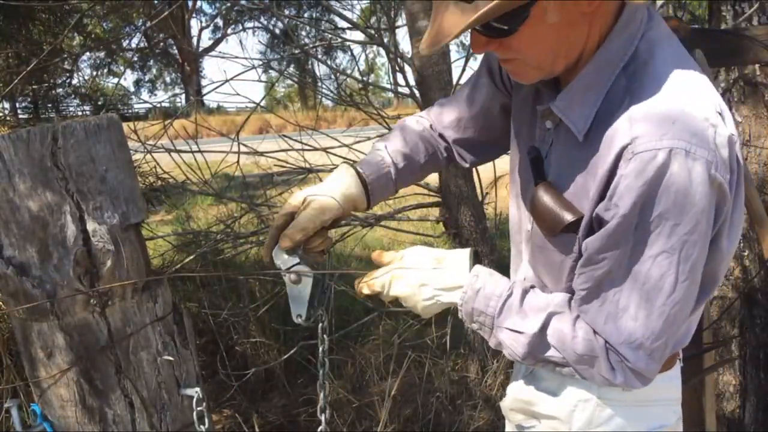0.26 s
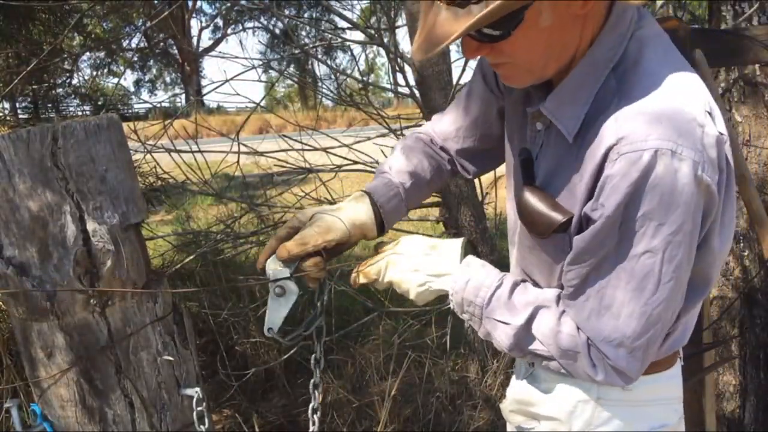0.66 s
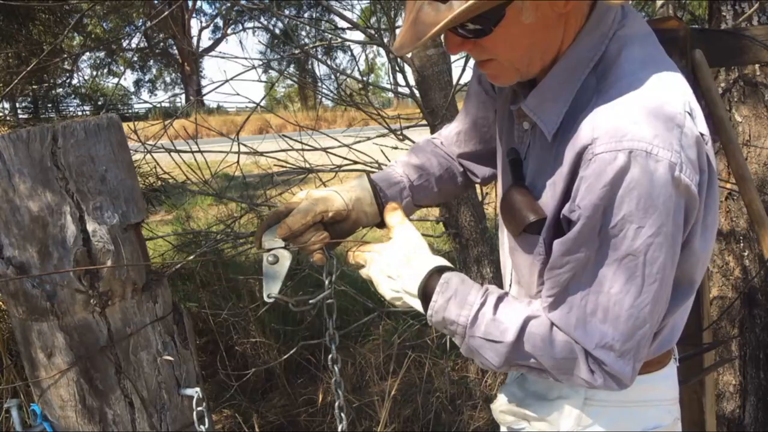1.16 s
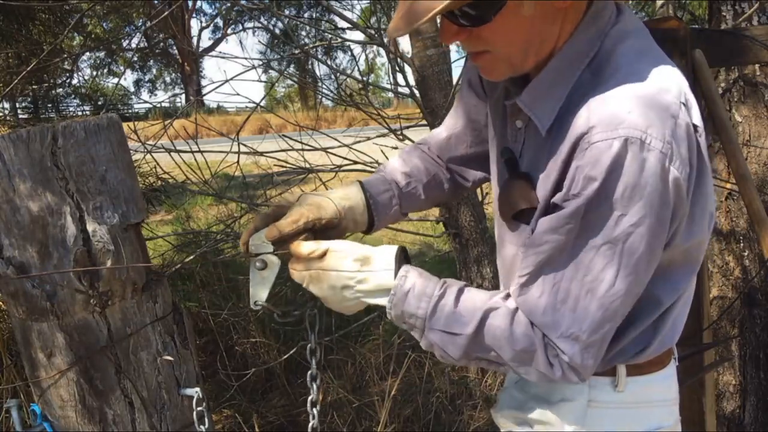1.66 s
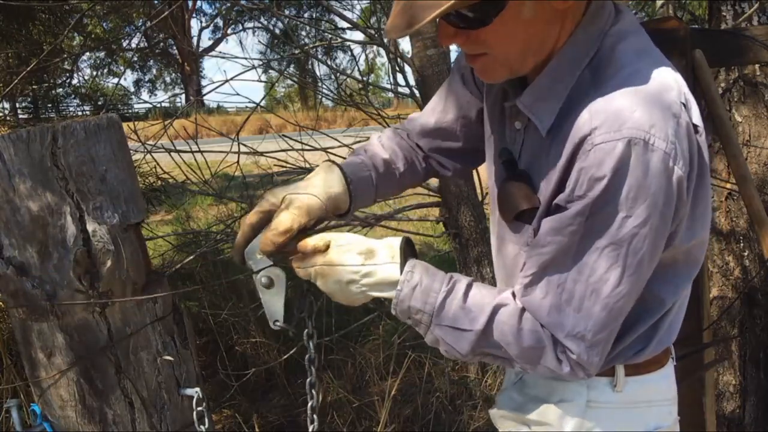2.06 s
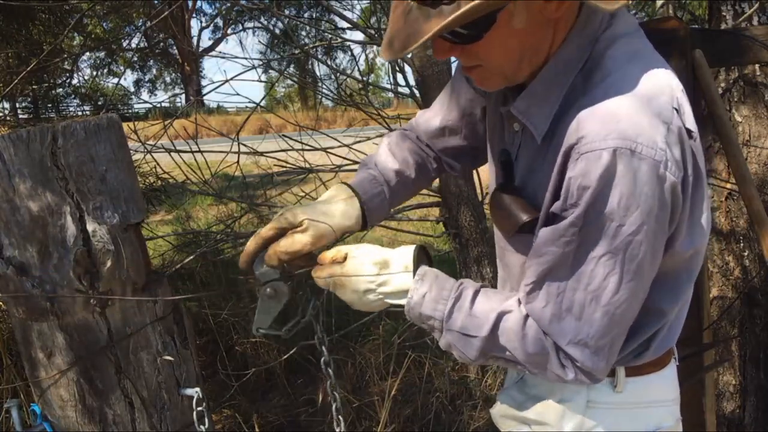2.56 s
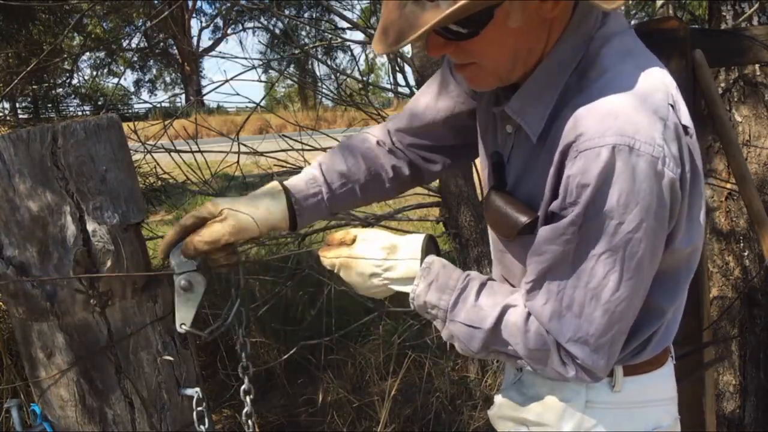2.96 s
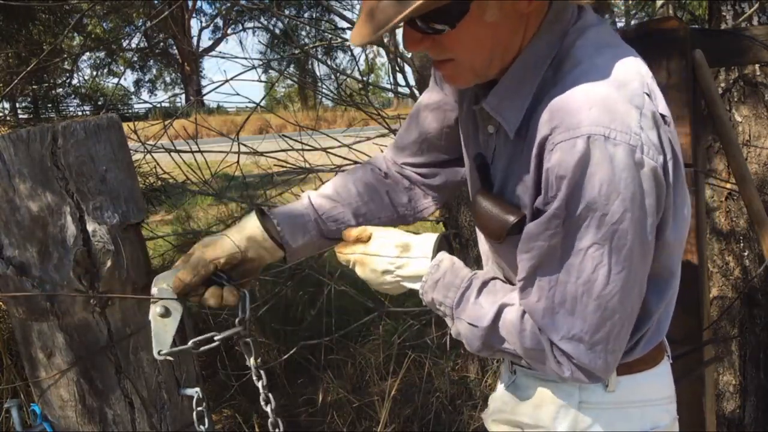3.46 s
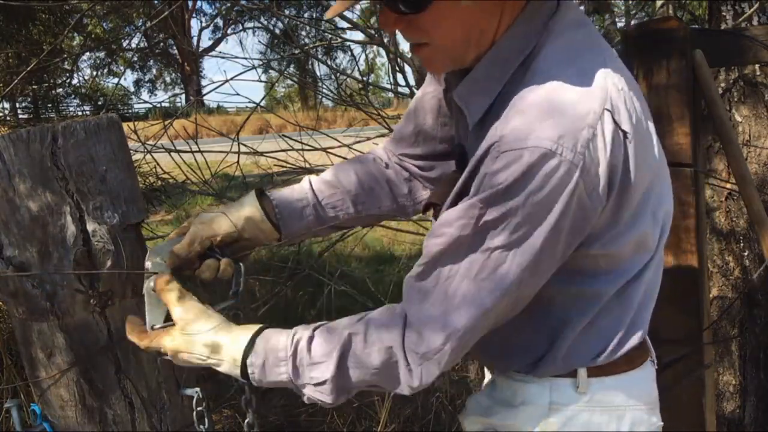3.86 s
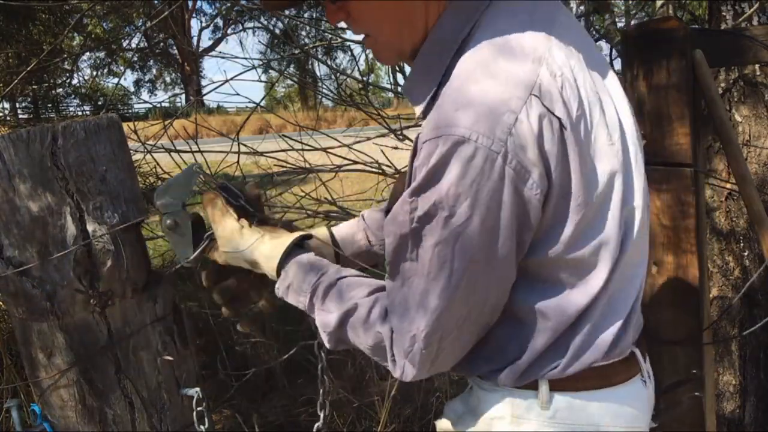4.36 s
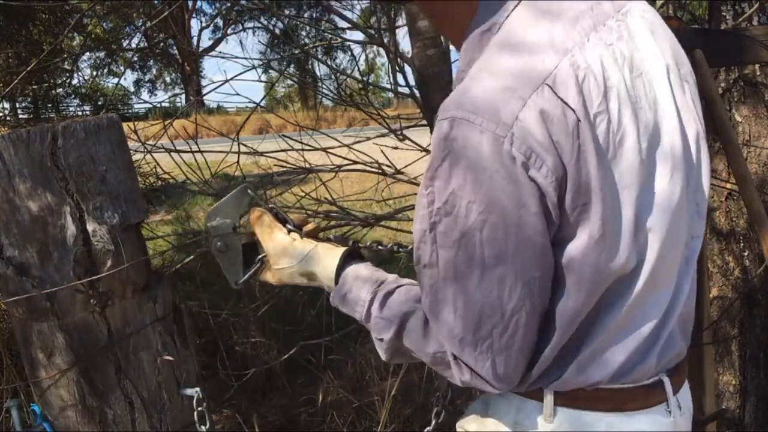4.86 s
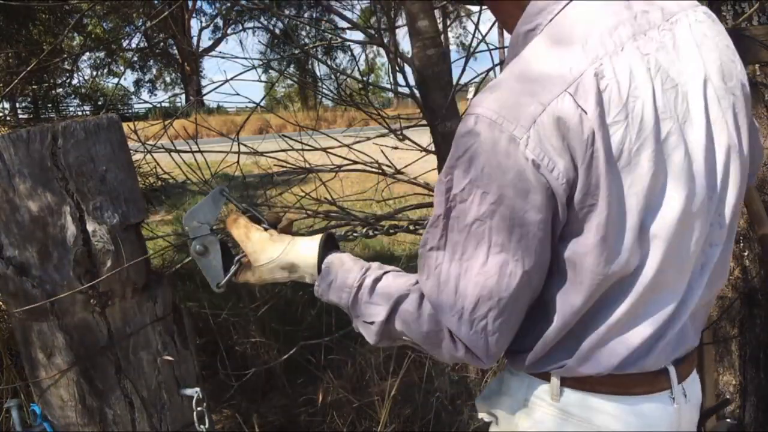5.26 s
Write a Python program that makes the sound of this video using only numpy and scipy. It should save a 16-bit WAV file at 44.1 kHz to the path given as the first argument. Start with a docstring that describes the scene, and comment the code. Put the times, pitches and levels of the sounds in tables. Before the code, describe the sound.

Close and dry, outdoors, over a quiet low hum of open air, soft wind rumble and faint distant road. From 0 to 0.4 s small chain links clink quickly and brightly, with light jaw knocks. At 0.6 s comes a firm clustered steel knock, then sparse ticks and clinks until 1.4 s. Small birds give short gliding whistles near 0.5, 1.1, 1.5 and most clearly 2.1-2.5 s, while gloves rub lightly. From 2.5 to 3.4 s the grip is pushed along the wire with gritty scrapes, tiny falling squeals at 2.6 and 3.1 s, and dense chain jingling, strongest near 2.75 s. Clicks and clinks resume from 3.8 s, with a faint bird. From 4.1 to 5.1 s the sleeve rustles in sweeps; knocks and thin high pings follow from 4.8 s. At 5.4-5.45 s a rapid, grating, loud steel clack closes the grip with a short high ring.

```python
"""Straining a fence wire

Outdoors, close to the microphone, gloved hands fit a steel chain strainer to a fence wire.
Chain, jaws and a loose part ring as decaying modes with noise at each contact; the grip clacks shut at the end.
Glove, sleeve and wire rub as dense random slips of filtered noise, and two pushes squeal.
Behind them small birds call in gliding whistles over the low hum of open country and moving air."""
import sys
import numpy as np
from scipy import signal
from scipy.fft import rfft, irfft
from scipy.io import wavfile
from scipy.ndimage import uniform_filter1d

SR = 44100
rng = np.random.default_rng(int(sys.argv[2]) if len(sys.argv) > 2 else 0)


def digitize_waveform(pressure):
    """Quantize a signal to 16-bit integers and store it at the path in sys.argv[1].

    Rows of a 2-D input are taken as channels; values are limited to [-1, 1].
    """
    field = np.atleast_2d(pressure).T
    bounded = np.clip(field, -1, 1)
    quanta = np.round(bounded * 32767).astype(np.int16)
    wavfile.write(sys.argv[1], SR, quanta)


N = 242356
TIME = np.arange(N) / SR
RING_TIME = np.arange(SR // 3) / SR  # every single hit lasts a third of a second

LINK_HZ = 4654  # pitch of an ordinary link
# clear clinks of the chain, levels before the trims in chain():
# [t/s, contact tick level/dB, low ring level/dB, high ring level/dB, link pitch f/Hz]
CLINK_EVENTS = [(0.0158, -38, -32.5, -36.5, 4700), (0.0394, -48, -39.5, -51, 4750),
                (0.1023, -54, -36.5, -43, 4760), (0.1113, -51, -30, -40.5, 4770),
                (0.137, -51, -38, -54, 4800), (0.1705, -42, -41.5, -43.5, 4750),
                (0.2029, -34, -36, -60, 4530), (0.26, -53, -38, -66, 4700), (0.3416, -56, -35.5, -61, 4360),
                (0.3979, -37, -39, -45, 4030), (0.6818, -49, -43, -69, 4700), (0.7954, -45, -38, -46, 4760),
                (0.8914, -39, -39.5, -46, 4750), (0.961, -38, -58, -40.5, 4700),
                (1.2208, -32, -38.5, -62, 5060), (1.3178, -38, -40, -66, 5100),
                (1.3482, -59, -50, -38, 4660), (1.4025, -38.5, -66, -58, 4660),
                (2.0098, -45, -63, -61, 4570), (2.0343, -43.5, -55, -52, 4500),
                (2.092, -48, -60, -46, 4660), (2.391, -36, -42, -59, 4660), (2.4588, -35, -48, -37.5, 4630),
                (2.572, -44, -33, -45, 4700), (2.7455, -29, -34, -33.5, 4730),
                (2.7572, -31, -28.5, -37, 4682), (3.1844, -56, -38, -38, 4697),
                (3.2163, -55, -30, -56, 4660), (3.2327, -48, -42, -62, 4600),
                (3.2882, -44, -34, -33.5, 4610), (3.3102, -43, -34, -41, 4603),
                (3.3414, -41, -39, -63, 4620), (3.367, -58, -38, -66, 4740), (3.475, -38.5, -52, -52, 4650),
                (3.814, -36, -57, -42, 4660), (3.8577, -33, -52, -43, 4660), (3.9992, -44, -42, -34, 4660),
                (4.018, -33, -41, -28.5, 4200), (4.1565, -34, -59, -42.5, 4580),
                (4.2332, -35.5, -46, -40.5, 4610), (4.2644, -32, -57, -43, 4330),
                (4.2902, -40, -43, -36, 4660), (4.341, -38, -58, -45, 4660), (4.54, -53, -41, -38.5, 4750),
                (4.8037, -26, -58, -41, 4666)]
# spells in which the chain jostles; slack links ring, held links only tick:
# [start t/s, end t/s, touches per s, mean tick level/dB, mean low ring level/dB]
JOSTLE_SPELLS = [(0, .2, 18.3, -69, -58), (.205, .39, 35, -51, -51.5), (0.652, 1.195, 8, -53, -65),
                 (2.56, 2.816, 70, -57, -45.5), (2.825, 3.385, 45, -55, -50.5),
                 (3.401, 3.619, 23, -46.5, -58), (4.102, 4.7, 13.1, -44, -54)]


def chain(tick_db=-4.0, low_db=-2.5, high_db=-2, spread_db=2.0, faint_high_db=-7):
    """Clear clinks of swinging links, with many faint touches between them."""
    out = np.zeros(N)
    for s, contact_db, low_ring_db, high_ring_db, pitch_hz in CLINK_EVENTS:
        hit = clink(contact_db + tick_db, low_ring_db + low_db, high_ring_db + high_db, pitch_hz)
        add(out, s, hit)
    for start, end, per_s, contact_db, ring_db in JOSTLE_SPELLS:
        for slot in np.arange(start, end, 1 / per_s):
            mean_levels = [contact_db, ring_db, ring_db + faint_high_db]
            levels = mean_levels + spread_db * rng.standard_normal(3)
            add(out, slot + rng.random() / per_s, clink(*levels, LINK_HZ))
    return out


# modes of a chain link, low group as on an ordinary link: [f/Hz, relative level/dB, t60/s]
LINK_LOW_MODES = [(3940, -12, 0.019), (4270, -28, 0.023), (4626, 0.5, 0.036), (4820, -1.5, 0.013)]
# modes of a chain link, high group: [f/Hz, relative level/dB, t60/s]
LINK_HIGH_MODES = [(8400, -15, 0.051), (10200, -1.5, 0.063), (10790, 8.5, 0.054), (12050, -11, 0.092),
                   (11420, 12.5, 0.028), (12100, -22, .08), (12200, -45, 0.067), (15700, -28, .04)]
# spectrum of the contact tick: [f/Hz, relative level/dB]
TICK_SPECTRUM = [(600, -61), (2000, 8.5), (3800, 8), (6000, 13), (7200, 2.5), (9000, 7.5), (12000, -1),
                 (15500, -5)]


def clink(contact_db, low_db, high_db, pitch_hz):
    """One link touches another: a tick and two groups of modes, the low group tuned to the link's pitch."""
    contact = colour(burst(t60=0.003, tail_t60=0.054, tail_db=-31), TICK_SPECTRUM)
    tick = peaked(chatter(contact, t60=0.018), contact_db)
    tuned_modes = np.array(LINK_LOW_MODES) * [pitch_hz / LINK_HZ, 1, 1]
    low = peaked(chatter(ring(tuned_modes, detune=0.0032, scatter=0.71), t60=0.018), low_db)
    high = peaked(chatter(ring(LINK_HIGH_MODES, detune=0.0085, scatter=1.0), t60=0.03), high_db)
    return tick + low + high


# jaws and lever knocking on wire and chain, ending in the clack of the grip; the body level is
# before the trims in jaws(): [t/s, body level/dB, crack level/dB]
KNOCK_EVENTS = [(0.203, -33.5, -38.5), (0.251, -38.5, -40.5), (0.342, -41, -37), (0.602, -35, -48),
                (0.6065, -31, -29.5), (0.617, -28.5, -29), (1.142, -37, -42.5), (1.205, -44, -58),
                (1.221, -39.5, -60), (1.262, -49, -67), (1.315, -38, -55), (1.635, -39.5, -66),
                (2.367, -40, -48.5), (2.449, -42, -46), (2.555, -32, -43), (2.6549, -36, -31.5),
                (3.042, -33.5, -40), (3.34, -35.5, -42.5), (3.871, -33, -35.5), (4.002, -42, -39),
                (4.791, -32, -38), (4.805, -35, -38), (4.930, -31.5, -27), (4.965, -48, -30),
                (4.982, -28, -38), (5.101, -32.5, -47), (5.302, -32, -27), (5.3855, -19.5, -52),
                (5.3884, -18, -39), (5.399, -17.5, -32), (5.4118, -20, -27), (5.420, -25.5, -29),
                (5.436, -14.5, -25), (5.4396, -16, -18), (5.446, -17.5, -23.5), (5.472, -42, -35)]
# modes of the strainer's jaws, ungloved: [f/Hz, relative level/dB, t60 before damping/s]
STRAINER_MODES = [(330, -14, 0.09), (440, -11, 0.12), (666, 1.5, 0.066), (975, 7.5, 0.023),
                  (1043, 1, 0.061), (1120, -14, 0.04), (1397, 4.5, 0.025), (1630, -5, 0.17),
                  (1750, 11, 0.016), (2025, 6, 0.057), (2423, 1, 0.039), (2600, -13, 0.04),
                  (3320, -19, 0.016), (4250, -13, 0.02), (6640, -7.5, 0.064)]
# spectrum of the dull body, for knocks and grinding: [f/Hz, relative level/dB]
THUD_SPECTRUM = [(60, -70), (160, -33), (290, 5), (450, 7.5), (700, -4), (1100, 5), (2000, -6.5),
                 (3000, -3.5), (4500, -12.5), (8000, -22.5), (15000, -20)]
# spectrum of the bright edge, for knocks and grinding: [f/Hz, relative level/dB]
CRACK_SPECTRUM = [(800, 1.5), (2500, 3), (4200, 4.5), (6500, 0), (7700, -6), (9200, 0.5), (12000, -5.5),
                  (15500, -13)]


def jaws(thud_db=-5, modes_db=-2.0, damping=1.33):
    """Heavy steel parts, damped by the glove: a crack, a thud and a short clang."""
    out = np.zeros(N)
    for s, body_db, crack_db in KNOCK_EVENTS:
        thud = colour(burst(t60=0.013, tail_t60=0.084, tail_db=-19), THUD_SPECTRUM)
        clang = ring(STRAINER_MODES, detune=.0015, scatter=.25, damping=damping)
        edge = colour(burst(t60=0.014, tail_t60=0.096, tail_db=-7), CRACK_SPECTRUM)
        crack = chatter(edge, t60=0.0097)
        body = peaked(thud, body_db + thud_db) + peaked(clang, body_db + modes_db)
        add(out, s, body + peaked(crack, crack_db))
    return out


BOUNCE_GAP_S, BOUNCE_LOSS_DB_PER_S = .011, 90
# a free-hanging steel part struck: [t/s, level of first bounce before buzz/dB, bouncing time/s]
PING_EVENTS = [(4.933, -35, .018), (5.094, -28, 0.005), (5.16, -45.5, .03), (5.298, -28, .04),
               (5.448, -10, 0.005)]
# modes of the free-hanging part: [f/Hz, relative level/dB, t60/s]
HANGING_MODES = [(8950, -28, 0.046), (9760, -22, 0.084), (9900, -3.5, 0.079), (10030, -20, 0.063),
                 (10370, -12, 0.094), (10760, -18, .07), (12200, -33, .11), (14100, -36, .065),
                 (14620, -38, .1)]


def pings(build_s=0.0005):
    """Loose steel bounces ever more weakly; its high ring builds up during contact, beats and buzzes."""
    out = np.zeros(N)
    for s, db, bouncing_s in PING_EVENTS:
        for lag in np.arange(0, bouncing_s, BOUNCE_GAP_S):
            tone = ring(HANGING_MODES, detune=.0007, scatter=.12)
            build_up = 1 - np.exp(-RING_TIME / build_s)
            add(out, s + lag, peaked(tone * build_up, db - BOUNCE_LOSS_DB_PER_S * lag))
    buzz = undb(1.5 * walk(400))
    return out * buzz


GRIND_ATTACK_S, GRIND_RELEASE_S = 0.015, .14
# the jaws grinding shut on the wire: [t/s, length/s, body level/dB, hiss level/dB]
GRIND_STROKES = [(5.39, 0.043, -41, -35.5)]


def grind():
    """Between its knocks the closing grip grates on the wire in dense slips."""
    slips = friction(grains_per_s=1800, spread_db=0.5, smooth_db=-7, jerk_db=2.5)
    body, hiss = colour(slips, THUD_SPECTRUM), colour(slips, CRACK_SPECTRUM)
    return strokes(GRIND_STROKES, body, hiss, GRIND_ATTACK_S, GRIND_RELEASE_S)


PUSH_ATTACK_S, PUSH_RELEASE_S = 0.011, 0.17
SQUEAL_SAG_HZ_PER_S = 7300
# pushes of the grip along the wire, levels before the trim in scrape():
# [t/s, length/s, body level/dB, hiss level/dB]
PUSH_STROKES = [(2.52, 0.05, -34, -46), (2.625, 0.096, -36, -52), (2.72, .15, -43, -61),
                (2.875, 0.19, -38.5, -56), (3.085, 0.027, -34.5, -50)]
# two of the pushes make the wire squeal: [t/s, length/s, starting pitch f/Hz, level/dB]
SQUEAL_EVENTS = [(2.631, 0.087, 2290, -37.5), (3.085, 0.069, 1706, -38.5)]
# resonances of the wire as the grip scrapes along it: [f/Hz, width/Hz, mean relative level/dB]
WIRE_RESONANCES = [(384, 230, 4.5), (945, 270, 1), (1340, 190, 5), (1720, 120, 0), (1980, 96, 1.5),
                   (3300, 490, -2.5), (4440, 82, -10)]
# spectrum of the rub, for scrape and gloves: [f/Hz, relative level/dB]
RUB_SPECTRUM = [(50, 0.5), (150, -4), (350, 1.5), (700, -2), (1200, -1), (1900, -2), (2700, -5.5),
                (4500, -1), (6000, -19.5), (15000, -32)]
# spectrum of the fine hiss, for scrape and gloves: [f/Hz, relative level/dB]
HISS_SPECTRUM = [(1500, -16), (3500, 7), (4700, 18.5), (5500, 6), (7600, 0.5), (9000, 2), (11000, -5),
                 (13000, -6.5), (15500, -6)]


def scrape(rub_db=-2, shift_db=4.0, trim_db=-1, squeal_width_hz=170):
    """The grip is pushed along the wire; resonances come and go, two pushes squeal with a falling pitch."""
    slips = friction(grains_per_s=2100, spread_db=2.5, smooth_db=-3, jerk_db=0.3)
    wire = np.zeros(N)
    for hz, width, db in WIRE_RESONANCES:
        resonance = signal.lfilter(*signal.iirpeak(hz, hz / width, fs=SR), slips)
        wire += undb(db + shift_db * walk(16)) * resonance
    body = unit(wire) + undb(rub_db) * unit(colour(slips, RUB_SPECTRUM))
    hiss = colour(slips, HISS_SPECTRUM)
    out = undb(trim_db) * strokes(PUSH_STROKES, body, hiss, PUSH_ATTACK_S, PUSH_RELEASE_S)
    flutter = unit(signal.lfilter(*signal.butter(2, squeal_width_hz, fs=SR), slips))
    for s, length, start_hz, db in SQUEAL_EVENTS:
        age = np.clip(TIME - s, 0, length)
        tone = np.sin(2 * np.pi * np.cumsum(start_hz - SQUEAL_SAG_HZ_PER_S * age) / SR)
        swell = np.sin(np.pi * age / length)
        out += undb(db) * swell * unit(flutter * tone)
    return out


SWEEP_ATTACK_S, SWEEP_RELEASE_S = 0.014, 0.24
HANDLING_ATTACK_S, HANDLING_RELEASE_S = 0.034, 0.62
# spells of light handling of the wire: [t/s, length/s, rub level/dB]
HANDLING_SPELLS = [(0.174, 0.093, -48.5), (0.598, 0.46, -57), (0.91, 0.61, -52.5), (1.717, 0.098, -50.5),
                   (2.18, 1.7, -52.5), (3.77, 1.69, -48)]
# sweeps of the sleeve as the arm swings round: [t/s, length/s, body level/dB, hiss level/dB]
SLEEVE_SWEEPS = [(4.14, 0.15, -54, -52.5), (4.34, 0.19, -45.5, -55), (4.575, 0.048, -41.5, -46),
                 (4.65, 0.11, -47.5, -47.5), (4.77, 0.12, -40, -47), (4.903, 0.059, -37.5, -39.5),
                 (4.99, 0.057, -42, -49.5)]
# spectrum of the sleeve's body: [f/Hz, relative level/dB]
SLEEVE_SPECTRUM = [(60, 0), (200, -5), (480, 1), (900, 0), (1300, -3.5), (1800, 2), (2800, -8.5),
                   (4500, -12.5), (6500, -17.5), (15000, -43)]
# spectrum of the sleeve's hiss: [f/Hz, relative level/dB]
SLEEVE_HISS_SPECTRUM = [(1500, 1.5), (3500, 3.5), (5000, 3), (6500, 2), (7700, -5.5), (9300, -2),
                        (11000, -7), (15500, -13)]


def gloves(light_hiss_db=-7):
    """Sleeve and glove crumple in small slips as the arm swings round; light handling comes in spells."""
    slips = friction(grains_per_s=1200, spread_db=-3.0, smooth_db=-5.0, jerk_db=2.53)
    light_hiss = undb(light_hiss_db) * unit(colour(slips, HISS_SPECTRUM))
    light = unit(colour(slips, RUB_SPECTRUM)) + light_hiss
    spells = [undb(db) * envelope(s, length, HANDLING_ATTACK_S, HANDLING_RELEASE_S)
              for s, length, db in HANDLING_SPELLS]
    effort = np.max(spells, axis=0)
    creases = friction(grains_per_s=670, spread_db=3.5, smooth_db=-1.5, jerk_db=0.2)
    body = colour(creases, SLEEVE_SPECTRUM) * undb(1.14 * walk(45))
    hiss = colour(creases, SLEEVE_HISS_SPECTRUM)
    swing = strokes(SLEEVE_SWEEPS, body, hiss, SWEEP_ATTACK_S, SWEEP_RELEASE_S)
    return effort * light + swing


# bird notes: [t/s, length/s, start f/Hz, end f/Hz, mid-note arch/Hz, direct level/dB]
BIRD_NOTES = [(0.443, 0.017, 2660, 3080, 88, -59), (0.495, 0.021, 2650, 2200, 0, -55),
              (1.066, 0.036, 3980, 3950, 348, -45.5), (1.099, 0.045, 4130, 4340, 373, -44),
              (1.448, 0.044, 4340, 4620, 0, -56), (1.406, .04, 3130, 3040, -150, -58.5),
              (1.515, .085, 3930, 3830, -650, -51), (1.588, 0.049, 3860, 3820, 74, -48),
              (2.113, 0.036, 2500, 3330, -250, -47.5), (2.142, 0.023, 4260, 3850, 130, -43),
              (2.159, 0.033, 3280, 3550, -300, -42.5), (2.188, 0.013, 4130, 3850, 100, -43),
              (2.188, 0.097, 2740, 2996, 375, -44.5), (2.483, 0.06, 4270, 4360, -200, -45),
              (3.78, 0.19, 3000, 2850, -74, -55.5), (3.902, 0.083, 3790, 4300, 272, -51)]
# low notes are reedier: [pitch f/Hz, octave level relative to the note/dB]
OCTAVE_LEVELS = [(3100, -7), (3700, -22)]


def birds(trees_db=-8, waver=0.011):
    """Gliding, arched whistles with a weak octave, scattered a little by the trees."""
    out = np.zeros(N)
    for s, length, start_hz, end_hz, arch_hz, db in BIRD_NOTES:
        u = np.linspace(0, 1, int(length * SR))
        arch = np.abs(np.sin(np.pi * u))
        glide_hz = start_hz + (end_hz - start_hz) * u + arch_hz * arch
        hz = glide_hz * (1 + waver * walk(357)[:len(u)])
        phase = 2 * np.pi * np.cumsum(hz) / SR
        octave = undb(np.interp(hz, *np.transpose(OCTAVE_LEVELS)))
        whistle = np.sin(phase) + octave * np.sin(2 * phase)
        add(out, s, undb(db) * np.sqrt(arch) * whistle)
    trees = rng.standard_normal(len(RING_TIME)) * fade(0.21)
    scattered = signal.fftconvolve(out, trees / np.linalg.norm(trees))[:N]
    return out + undb(trees_db) * scattered


# spectrum of the air over open country: [f/Hz, relative level/dB]
COUNTRY_SPECTRUM = [(15, -19), (25, -28), (64, 1), (215, -6), (331, -9.5), (722, -7.5), (997, 0),
                    (1240, -7.5), (2010, -11.5), (2700, -20), (4620, -25.5), (6380, -20), (7500, -32),
                    (10400, -26), (15500, -38)]


def country(air_db=-51.5, drone_hz=55, drone_db=-62, road_hz=1000, road_db=-59):
    """Outdoor air as slowly drifting noise, a low wavering drone and a far road as resonant noise."""
    air = unit(colour(rng.standard_normal(N), COUNTRY_SPECTRUM)) * undb(air_db + 1.2 * walk(5.73))
    wavering_hz = drone_hz * (1 + 0.046 * walk(21.8))
    drone = unit(np.sin(2 * np.pi * np.cumsum(wavering_hz) / SR) * undb(5.9 * walk(3.9)))
    road = unit(signal.lfilter(*signal.iirpeak(road_hz, 3.5, fs=SR), rng.standard_normal(N)))
    return air + undb(drone_db) * drone + undb(road_db) * road


# low rumble of moving air, interpolated between points: [t/s, level/dB]
RUMBLE_LEVELS = [(0, -65), (2.6, -59), (4.4, -60), (4.97, -58), (5.2, -69)]


def rumble(corner_hz=70):
    """Moving air buffets the microphone softly: noise in a band from 22 Hz to the corner."""
    band = signal.butter(2, [22, corner_hz], "band", fs=SR, output="sos")
    gust = signal.sosfilt(band, rng.standard_normal(N))
    return unit(gust) * undb(np.interp(TIME, *np.transpose(RUMBLE_LEVELS)))


def burst(t60, tail_t60, tail_db):
    """A contact: a short crush, then weak scatter from nearby things."""
    return rng.standard_normal(len(RING_TIME)) * (fade(t60) + undb(tail_db) * fade(tail_t60))


def ring(modes, detune, scatter, damping=1):
    """Decaying modes; each blow lands elsewhere and shares its energy differently."""
    mode_hz, db, t60 = np.transpose(modes)
    shift, size, side = rng.standard_normal((3, len(mode_hz)))
    gains = undb(db) * np.exp(scatter * size) * np.sign(side)
    shifted_hz = mode_hz * (1 + detune * shift)
    return sum(gain * np.sin(2 * np.pi * hz * RING_TIME) * fade(decay / damping)
               for gain, hz, decay in zip(gains, shifted_hz, t60))


def chatter(x, t60):
    """A loose part buzzes against its neighbour for a moment, so its ring builds up unevenly."""
    count = len(RING_TIME)
    touches = rng.standard_normal(count) * (rng.random(count) < 1500 / SR) * fade(t60)
    touches[0] = 1
    return signal.fftconvolve(x, touches)[:len(x)]


def friction(grains_per_s, spread_db, smooth_db, jerk_db):
    """Surfaces catch and let go: dense uneven slips, each a few milliseconds long, coming in jerks."""
    sizes = undb(spread_db * np.minimum(rng.exponential(size=N), 3))
    slips = (rng.random(N) < grains_per_s / SR) * rng.standard_normal(N) * sizes
    power = signal.lfilter([1], [1, -np.exp(-1 / (0.0011 * SR))], slips ** 2)
    grain = np.sqrt(power) * rng.standard_normal(N)
    return (unit(grain) + undb(smooth_db) * rng.standard_normal(N)) * undb(jerk_db * walk(70))


def envelope(s, length, attack_s, release_s):
    """One movement: it builds up, holds, then dies away by 60 dB over the release."""
    attack = np.clip((TIME - s) / attack_s, 0, 1)
    return attack * np.exp(-np.log(1000) * np.maximum(TIME - s - length, 0) / release_s)


def strokes(rows, body, hiss, attack_s, release_s):
    """Rubbing movements that share one envelope, each with its own amount of body and hiss."""
    power = sum(np.outer(undb([body_db, hiss_db]), envelope(s, length, attack_s, release_s)) ** 2
                for s, length, body_db, hiss_db in rows)
    return unit(body) * np.sqrt(power[0]) + unit(hiss) * np.sqrt(power[1])


def colour(x, points):
    """Causal minimum-phase filter with a (f/Hz, level/dB) response, made by folding the cepstrum."""
    hz, db = np.transpose(points)
    size = 8192
    grid = np.maximum(np.arange(size // 2 + 1) * SR / size, 1)
    cepstrum = irfft(np.log(undb(np.interp(np.log(grid), np.log(hz), db))))
    cepstrum[1:size // 2] *= 2
    cepstrum[size // 2 + 1:] = 0
    return signal.fftconvolve(x, irfft(np.exp(rfft(cepstrum))))[:len(x)]


def walk(rate):
    """Smooth random drift with spread 1, taking this many steps per second."""
    k = max(int(SR / rate), 1)
    steps = np.repeat(rng.standard_normal(N // k + 1), k)
    return unit(uniform_filter1d(steps, k)[:N])


def fade(t60):
    """Exponential decay, 60 dB down after t60 seconds."""
    return np.exp(-np.log(1000) * RING_TIME / t60)


def peaked(x, db):
    """Scale a hit so that its loudest 3 ms have this level."""
    return x * undb(db) / np.sqrt(uniform_filter1d(x ** 2, size=128, mode="constant").max())


def add(track, s, hit):
    """Mix a hit into the track at time s."""
    i = max(int(s * SR), 0)
    track[i:i + len(hit)] += hit[:max(N - i, 0)]


def undb(db):
    """Decibels to gain."""
    return 10 ** (np.asarray(db) / 20)


def unit(x):
    """Scale to rms 1."""
    return x / np.sqrt(np.mean(x ** 2))


def scene():
    """All sources at one microphone."""
    steel = chain() + jaws() + pings() + grind()
    rubbing = scrape() + gloves()
    background = birds() + country() + rumble()
    return (steel + rubbing + background)[None]


def record(dry, top_hz=15800):
    """The recorder cuts the top with a steep low-pass."""
    return signal.sosfilt(signal.ellip(10, .2, 80, top_hz, fs=SR, output="sos"), dry)


dry = scene()
out = record(dry)
digitize_waveform(out)
```